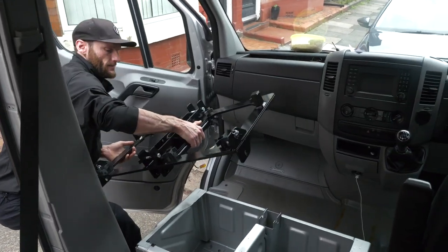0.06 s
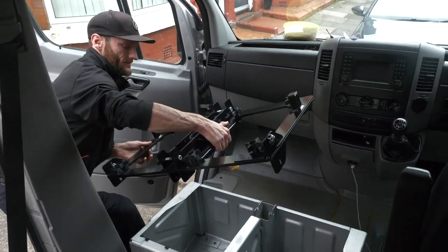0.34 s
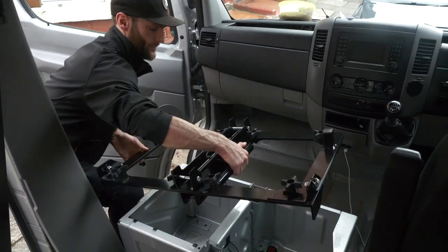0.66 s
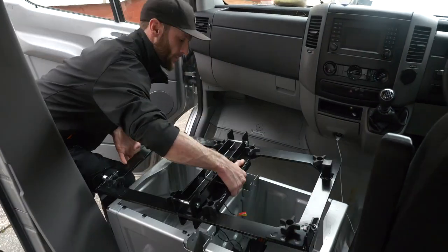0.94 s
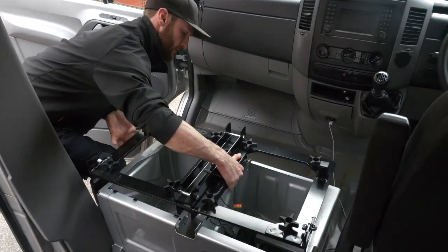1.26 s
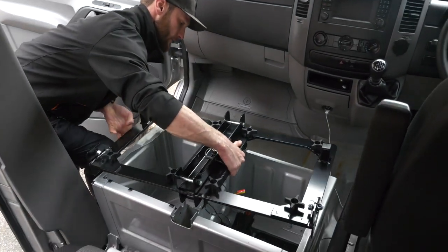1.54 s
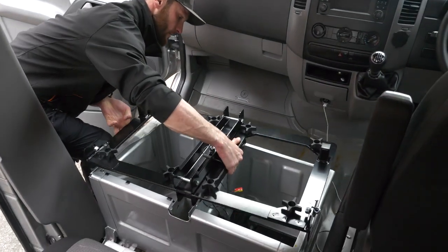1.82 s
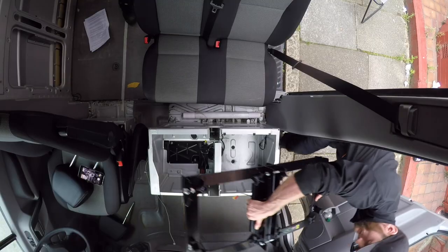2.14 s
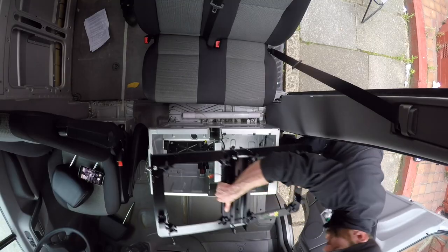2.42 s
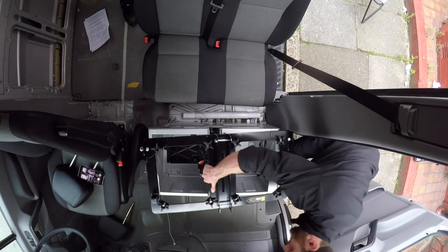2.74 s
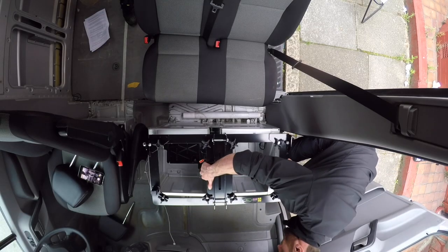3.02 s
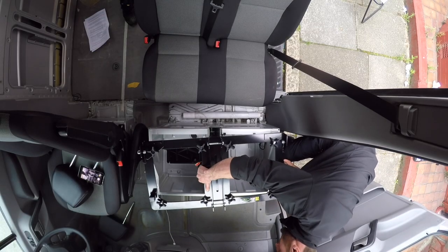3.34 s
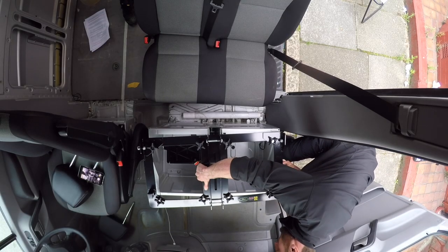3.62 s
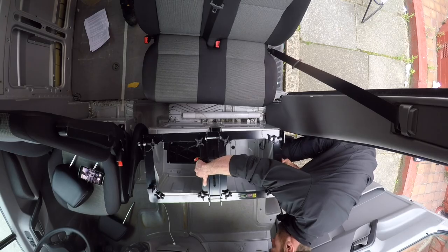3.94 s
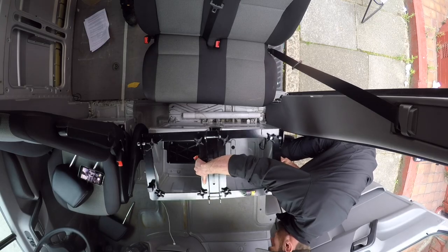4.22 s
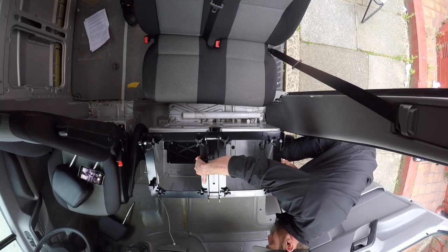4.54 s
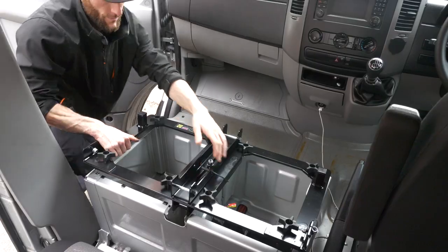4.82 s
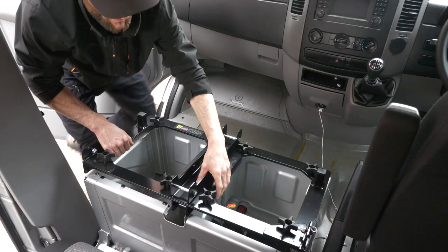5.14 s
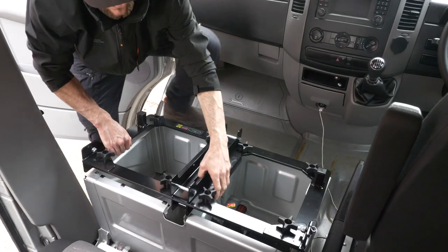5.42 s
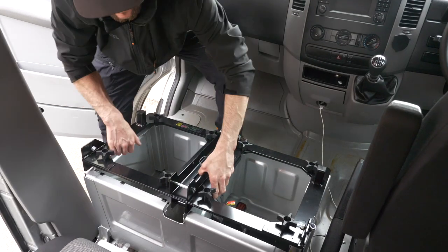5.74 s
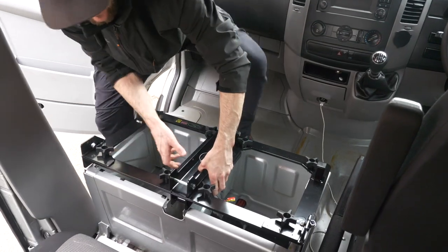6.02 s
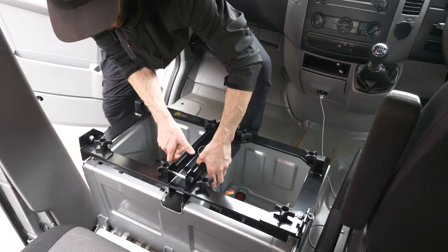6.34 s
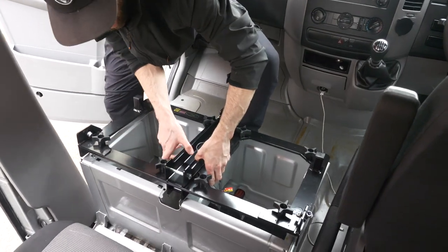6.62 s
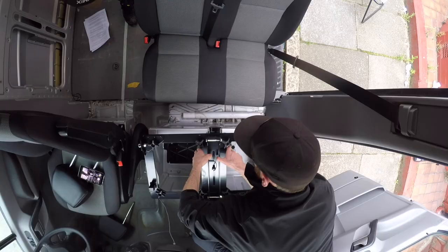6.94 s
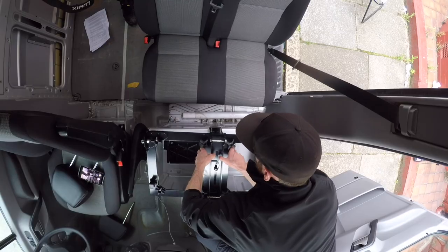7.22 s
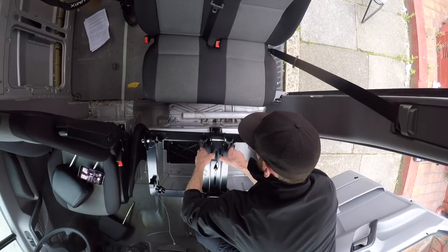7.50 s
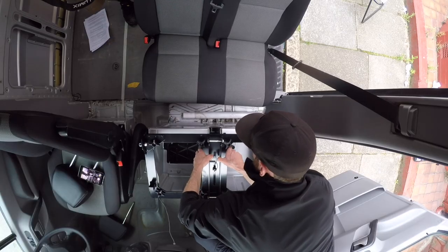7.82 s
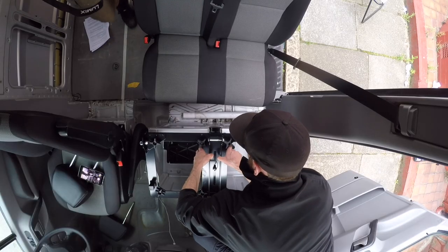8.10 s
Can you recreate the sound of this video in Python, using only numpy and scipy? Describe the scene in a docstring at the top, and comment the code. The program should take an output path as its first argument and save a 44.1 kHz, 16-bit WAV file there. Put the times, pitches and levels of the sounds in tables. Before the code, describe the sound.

A faint, low outdoor rumble comes through a van's open door throughout, with soft sleeve rustle. In the first second a steel seat frame taps and rings very lightly as it is carried. It knocks at 1.8 seconds and lands on its sheet-metal base at 2 with a bright, ringing clank. A quick run of knocks and loose rattles follows until about 2.8 seconds. A lull holds only small ticks and a little cloth movement. From 5.7 to 6 seconds the frame knocks again as it is jiggled. At about 6.3 seconds the slide catch snaps home with a sharp double crack, the loudest moment. A coil spring rings with it, thin, high and slightly buzzing, until a hand damps it and a small click comes near 6.8. One firmer knock sounds at 7.3 seconds, and a few lighter ones around 8.

```python
"""Over a faint outdoor rumble at a van's open door, sleeves rustle and a steel seat frame taps and rings
faintly as it is lifted in. It lands on its sheet-metal base with a bright clank and rocks back: impacts
excite the modes of frame and panels, and loose fittings rattle. As it is jiggled into place, a coil spring
is kicked and the slide catch snaps home. The spring sings until a hand damps it; a few knocks follow."""
import sys
import numpy as np
from scipy import signal
from scipy.fft import rfft, irfft, next_fast_len
from scipy.io import wavfile
from scipy.ndimage import uniform_filter1d, map_coordinates

SR = 44100
rng = np.random.default_rng(int(sys.argv[2]) if len(sys.argv) > 2 else 0)


def store_pcm(level_fs):
    """Save levels as 16-bit WAV."""
    pcm = np.round(np.clip(level_fs, -1, 1) * 32767).astype(np.int16)
    wavfile.write(sys.argv[1], SR, np.atleast_2d(pcm).T)


N = 360297

# Spectra of the outdoor rumble, the wash of air above it and the sleeve cloth.
# Each row: frequency in Hz, relative spectral density in dB.
RUMBLE_SPECTRUM = [(8, -14), (20, 6.5), (40, -1), (70, -12.5), (140, -34.5), (400, -64), (1000, -120)]
WASH_SPECTRUM = [(41, -23.5), (70, 4), (102, -10.5), (205, -8.5), (259, -7.5), (369, -7), (1600, -12.5),
                 (2080, -45), (3520, -120)]
CLOTH_SPECTRUM = [(590, -14.5), (1000, 1), (1710, -0.5), (1830, 2), (2310, 2), (3750, 2), (4900, -5.5),
                  (13800, -15.5), (16000, -25.5)]
# Slow swell of the rumble. Each row: time in seconds, relative level in dB.
RUMBLE_SWELL = [(.7, -61.5), (3.3, -64), (4.7, -65.5), (5.5, -62), (7.7, -58)]
# Arm movements. Each row: time of the peak in seconds, level in dB, rise and fall in seconds.
ARM_SWEEPS = [(.55, -63.5, 0.67, 0.18), (3.95, -65.5, .15, .3), (4.87, -61.5, 0.28, 0.13),
              (5.38, -57.5, 0.22, 0.15), (6.83, -59, 0.044, .03)]
# Knocks of the frame on its base. Each row: start in seconds, strength in dB, thud against strength
# in dB, hardness in dB, looseness as a factor (1 gives the usual ring and chatter).
IMPACTS = [(.384, -53.5, -1, 2, 1.46), (.965, -56, -17, 4, 1.2), (1.789, -29, -15.5, 3, .86),
           (2.009, -21.5, -5.5, -3.5, 0.86), (2.04, -35.5, -20, 8.5, 2.27), (2.22, -30.5, -6, -7, 2.1),
           (2.31, -32.5, -8, 4.5, 1.08), (2.361, -31.5, -12, 2.5, 1.14), (2.477, -38, -9.5, 3, 1.6),
           (2.55, -45.5, -7, -2, 1.5), (2.63, -23, -4, 8, 0.87), (2.682, -33.5, -7.5, 0.5, 2.06),
           (2.755, -28, -1.5, 1, 0.92), (2.796, -33, -2, 1.5, 0.8), (2.954, -55.5, 11.5, -39, 1.62),
           (3.775, -56.5, -7, 5, 1.7), (4.517, -53.5, -11, 2.5, 2.7), (5.026, -57.5, -4, 6.5, 1.7),
           (5.653, -42.5, 2, -4.5, 0.78), (5.776, -50, 7, -15.5, 0.86), (5.872, -27, -10, -4, .95),
           (5.972, -30, -10.5, -5.5, 1.24), (6.139, -49, 3, -1.5, .85), (6.201, -43.5, 0.5, 9.5, 2),
           (6.249, -29.5, -4, 10.5, 0.68), (6.267, -16.5, -22, 7.5, 0.59), (6.3, -19.5, -26, 5.5, 0.99),
           (6.412, -38, -6.5, 13, 1.14), (6.576, -46.5, -8, 4, 1.16), (6.844, -48, -13, 17, 1.32),
           (7.05, -50.5, 0.5, 10, 1), (7.221, -44, 8, -10, 1.37), (7.283, -25.5, -5.5, -5.5, 0.94),
           (7.402, -51.5, -6, 4.5, 1.5), (7.561, -61.5, 7.5, 11, 1), (7.73, -61.5, 11, -10, 1.1),
           (7.81, -57.5, -4, 4.5, 1.7), (7.956, -42, 4, -14, 0.84), (8, -51.5, 3, 10.5, 0.99),
           (8.134, -46, 1, -7.5, 1.05)]
# Registers of the panel modes: thud, body, clank, crack. Each row: lower and upper edge in Hz,
# t60 in seconds at looseness 1, relative level of the late tail in dB, its t60 in seconds.
PANEL_REGISTERS = [(68, 300, 0.39, -14, 1), (305, 1490, 0.25, -16.5, 0.71), (1420, 4020, 0.2, -30.5, 0.54),
                   (4400, 28000, 0.15, -33, .3)]
# Dense modes of the sheet metal. Each row: frequency in Hz, relative spectral density in dB.
PANEL_SPECTRUM = [(35, -28.5), (60, 7), (287, -1.5), (338, -4.5), (458, 0.5), (803, 0.5), (882, 1),
                  (1170, 0), (1780, -2), (2140, -1.5), (2770, 2.5), (12400, -20.5), (16000, -37.5)]
# Stereo width of the steel. Each row: frequency in Hz, side against mid in dB.
STEEL_WIDTH = [(60, -1), (110, 2.5), (200, -1.5), (380, -3.5), (700, -5.5), (1290, -5), (2380, -9),
               (4400, -9), (8120, 1.5), (15000, -2)]
# Strong modes of frame and base. Each row: frequency in Hz, free t60 in seconds,
# relative levels in dB while landing, while carried or sliding, and once seated.
FRAME_MODES = [(77.2, 0.71, -36, -13, -8), (150.9, 0.55, -6.5, -9.5, -8.5), (187.3, 0.55, -13, -15.5, -38),
               (222, 0.46, -17, -29, -13.5), (286.1, 0.42, -12, -8, -13.5),
               (302.1, 0.59, -10.5, -15, -16.5), (457, 0.34, -14, -15.5, -9), (509, 0.47, -26, -13, -17),
               (579, 0.34, -38, -13, -21), (630, 0.3, -25, -6, -17.5), (711, 0.34, -19, -10.5, -27.5),
               (737, 0.31, -12, -8, -26.5), (812, 0.28, -25, -30, -21), (900, 0.27, -13, -11.5, -10.5),
               (950, 0.37, -23, -12, -33.5), (1034, 0.21, -12, -32, -9.5), (1242, 0.37, -16.5, -14, -18),
               (1461, 0.28, -14, -11, -16.5), (1515, 0.089, -3, -12, -12.5), (1736, 0.33, -2.5, -20, -28.5),
               (1822, 0.32, -8, -19, -20), (2640, 0.3, -28, -14.5, -31), (2735, 0.15, -23, -24, -7.5),
               (2790, 0.22, -6.5, -35, -20), (2910, 0.11, -4, -42, -7), (3200, 0.26, -8, -38, -30),
               (3440, 0.18, -5, -11, -19.5), (3830, 0.37, -5.5, -28, -38), (5500, 0.18, -24.5, -9, -16),
               (6780, 0.28, -12, -19, -24)]
# The faint ring of the carried frame (0.40 s), the bright 3 kHz clank of its landing (2.011 s) and,
# in the other rows, loose fittings rattling. Each row: start in seconds, centre pitch in Hz,
# level in dB, t60 of the train and t60 of one tick in seconds, pitch scatter as a fraction.
PING_TRAINS = [(.40, 2575, -55, 0.64, 0.24, 0.006), (2.044, 3990, -35, 0.8, 0.213, 0.0132),
               (2.011, 2953, -19, 0.25, 0.093, .17), (2.044, 6350, -30, 0.42, 0.045, .05),
               (2.708, 5840, -35.5, 0.33, 0.047, 0.062), (4.519, 3155, -37, .11, 0.042, 0.101),
               (6.846, 3385, -35, 0.089, 0.082, 0.301)]
# Clicks and snaps of the slide catch. Each row: start in seconds, relative peak in dB.
CATCH_SNAPS = [(4.5205, -39), (6.2677, 3), (6.2708, -6), (6.2784, -17), (6.3006, 1)]
# Kicks to the spring. Each row: start in seconds, relative levels of ringing and of buzz in dB.
SPRING_KICKS = [(6.199, -9, -8.5), (6.25, 2.5, 3.5), (6.266, 6.5, 4.5), (6.412, 4.5, -0.5), (6.53, -3, -7),
                (6.582, 3, -9)]
# Modes of the coil spring. Each row: frequency in Hz, relative levels in dB when free and when
# reseated, t60 in seconds under the hand.
SPRING_MODES = [(1992, -50, -63, 0.42), (2401, -42, -43, 0.36), (2810, -44, -61, 0.36),
                (3176, -46, -44, 0.22), (3381, -40, -56, 0.4), (3661, -44, -58, 0.48),
                (4204, -50, -56, 0.22), (4492, -50, -56, 0.37), (4818, -45, -59, 0.68),
                (5577, -48, -59, 0.25), (5922, -48, -55, 1.3), (6492, -52, -58, 0.23),
                (6955, -47, -67, 0.4), (7467, -54, -61, 0.28), (8025, -51, -61, 0.28),
                (8568, -46, -63, 0.34), (8915, -50, -64, 0.28), (9555, -56, -64, 0.24),
                (10048, -53, -65, 0.3), (10755, -57, -65, 0.23), (11583, -53, -61, 0.22),
                (12123, -53, -61, 0.2), (12333, -54, -60, 0.2), (14085, -60, -77, 0.34),
                (14645, -57, -66, 0.21), (14990, -56, -64, 0.2), (15260, -56, -65, 0.2)]

CARRY_FROM_S, CARRY_TO_S = .03, 1.05
TAP_DB, TAP_SCATTER_DB, TAP_THUD_DB, TAP_HARD_DB, TAP_LOOSE = -63, .5, -15, 2.5, 2.65
LANDING_S, SLIDING_S, SEATED_S = 2, 2.2, 4
ROCK_DELAY_S, ROCK_DB, ROCK_THUD_DB, ROCK_SOFTER_DB = .088, -17, -.5, 8
BODY_DB, CLANK_DB, CRACK_DB = .5, -.5, -12  # against the strength of a blow
HARD_TILT = .24  # dB moved from body to clank per dB of hardness
CHATTER_S = .0065  # steel bounces this long before decaying, at looseness 1
RESEAT_S, GRIP_S, LOCK_S = 6.58, 6.668, 6.846  # the spring reseats, is gripped, and the catch locks
TOP_HZ = 15900


def amp(db):
    """Amplitude grows tenfold for every 20 dB."""
    return 10 ** (np.asarray(db) / 20)


def along(points, hz):
    """Interpolation of (Hz, value) points on a logarithmic frequency axis."""
    freqs, values = np.transpose(points)
    return np.interp(np.log(hz + 1), np.log(freqs + 1), values)


def wobble(rate, size):
    """Smooth random modulation: a spline through `rate` knots a second."""
    return map_coordinates(rng.standard_normal(1024), [np.arange(size) * rate / SR], mode="wrap")


def filtered(x, response):
    """Linear filtering multiplies the spectrum by a frequency response."""
    size = x.shape[-1]
    padded = next_fast_len(size + SR // 8)
    return irfft(rfft(x, padded) * response(np.fft.rfftfreq(padded, 1 / SR)), padded)[..., :size]


def fade(t, t60):
    """Exponential damping: full strength until t = 0, then 60 dB lost every t60 seconds."""
    return np.exp(-np.log(1000) * np.maximum(t, 0) / max(t60, 1e-3))


def add(track, s, sound):
    """Superposition: the sound adds to the track from s seconds on."""
    part = track[:, max(round(s * SR), 0):][:, :sound.shape[-1]]
    part += sound[..., :part.shape[-1]]


def noise(spectrum, width, band=lambda hz: 1):
    """Coloured noise with a mid of rms 1; an independent side signal decorrelates the channels."""
    def response(hz):
        return amp(along(spectrum, hz)) * band(hz) * np.array([np.ones_like(hz), amp(along(width, hz))])
    mid, side = filtered(rng.standard_normal((2, N)), response)
    return np.array([mid + side, mid - side]) / np.std(mid)


def partial(hz, t):
    """One normal mode: a sinusoid with a phase difference between left and right."""
    phase = 2 * np.pi * (hz * t + rng.random())
    side = rng.choice([-1, 1]) * amp(along(STEEL_WIDTH, hz)) * np.cos(phase)
    mid = np.sin(phase)
    return np.sqrt(2) * np.array([mid + side, mid - side])


def street(wash_db=-66, rumble_db=-1):
    """Ambient noise enters by the open door: a steady wash over a slowly varying rumble."""
    swell_db = np.interp(np.arange(N) / SR, *np.transpose(RUMBLE_SWELL))
    wash = amp(wash_db) * noise(WASH_SPECTRUM, width=[(100, 4), (1000, -3)])
    rumble = amp(swell_db + rumble_db) * noise(RUMBLE_SPECTRUM, width=[(25, 9.1), (100, 11)])
    return wash * amp([[-.76], [.76]]) + rumble * amp([[2.5], [-3]])


def sleeves(still_db=-66.5, flutter_db=1.75):
    """Friction of cloth makes noise; each arm movement adds its power to a steady hush."""
    t = np.arange(N) / SR
    swells = [amp(db) * np.exp(-.5 * ((t - s) / np.where(t < s, rise_s, fall_s)) ** 2)
              for s, db, rise_s, fall_s in ARM_SWEEPS]
    envelope = np.sqrt(amp(still_db) ** 2 + np.sum(np.square(swells), axis=0))
    flutter = amp(flutter_db * wobble(28, N))
    cloth = noise(CLOTH_SPECTRUM, width=[(1000, -2.5), (3000, -8), (8000, 1)])
    return envelope * flutter * cloth * amp([[-.76], [.76]])


def contacts(tap_count=8):
    """Impact excitation by taps, knocks and rocking back: harder contact favours higher frequencies."""
    taps = [(CARRY_FROM_S + (CARRY_TO_S - CARRY_FROM_S) * (k + rng.random()) / tap_count,
             TAP_DB + TAP_SCATTER_DB * rng.standard_normal(), TAP_THUD_DB, TAP_HARD_DB, TAP_LOOSE)
            for k in range(tap_count)]
    # the frame's weight rocks it back after each knock, in proportion to the thud
    rocks = [(s + ROCK_DELAY_S, db + thud_db + ROCK_DB, ROCK_THUD_DB, hard_db - ROCK_SOFTER_DB, loose)
             for s, db, thud_db, hard_db, loose in IMPACTS]
    s, db, thud_db, hard_db, loose = np.transpose(IMPACTS + rocks + taps)
    tilt_db = HARD_TILT * hard_db
    levels = [db + thud_db, db + BODY_DB - tilt_db, db + CLANK_DB + tilt_db, db + CRACK_DB + hard_db]
    # Each row: start in seconds, level of each of the four registers in dB, looseness.
    return np.transpose([s, *levels, loose])


def panel_clanks(blows, trim_db=(-1, -2, -1, 0), rise_s=(.008, .003, .002, .001), chatter_db=2):
    """Modal overlap: the dense modes of struck panels merge into bands of decaying noise."""
    out, t = np.zeros((2, N)), np.arange(int(.7 * SR)) / SR
    knots = t[::128]
    for k, (lo, hi, t60, tail_db, tail_t60) in enumerate(PANEL_REGISTERS):
        panel = noise(PANEL_SPECTRUM, STEEL_WIDTH,
                      band=lambda hz: 1 / np.sqrt((1 + (lo / (hz + 1)) ** 12) * (1 + (hz / hi) ** 12)))
        for s, *levels, loose in blows:
            strike = amp(levels[k] + trim_db[k]) * (1 - np.exp(-t / rise_s[k]))
            free_s = t - CHATTER_S * loose
            decay = np.hypot(fade(free_s, t60 * loose), amp(tail_db) * fade(free_s, tail_t60))
            # steel bouncing on steel makes the level uneven
            bounce = amp(chatter_db * np.interp(t, knots, rng.standard_normal(len(knots))))
            start = rng.integers(N - len(t))
            add(out, s, strike * decay * bounce * panel[:, start:start + len(t)])
    return out


def frame_ring(blows, level_db=.5, rise_s=.0036, scatter_db=2, rough=.14):
    """Boundary conditions: how the frame rests decides which of its strong modes answer a blow."""
    out, t = np.zeros((2, N)), np.arange(SR // 2) / SR
    hz, t60, *support_db = np.transpose(FRAME_MODES)
    register = np.searchsorted([row[1] for row in PANEL_REGISTERS[:-1]], .9 * hz)
    modes = np.array([partial(f, t) * fade(t, life) * (1 + rough * wobble(45, len(t)))
                      for f, life in zip(hz, t60)])
    for s, *levels, loose in blows:
        support = 0 if LANDING_S < s < SLIDING_S else 1 if s < SEATED_S else 2
        db = np.take(levels, register) + support_db[support] + level_db
        db += scatter_db * rng.standard_normal(len(hz))
        ring = np.tensordot(amp(db) * rng.choice([-1, 1], len(hz)), modes, 1)
        damping = np.exp(-t / .03 * max(1 / loose - 1, 0))  # firm contact cuts the ringing short
        add(out, s, ring * damping * (1 - np.exp(-t / rise_s)))
    return out


def steel_pings(ticks_per_s=58, uneven=.2, rise_s=.00059, ping_count=8):
    """Damped modes in quick succession: the frame's faint ring, its landing clank, rattling fittings."""
    out, t = np.zeros((2, N)), np.arange(SR // 8) / SR
    for s, hz, db, train_t60, tick_t60, scatter in PING_TRAINS:
        envelope = fade(t, tick_t60) * (1 - np.exp(-t / rise_s))
        gaps = (1 + uneven * rng.standard_normal(11)) / ticks_per_s
        for delay in np.cumsum(gaps) - gaps[0]:
            pitches = hz * np.exp(scatter * rng.standard_normal(ping_count))
            pings = sum(partial(f, t) for f in pitches) / np.sqrt(ping_count)
            add(out, s + delay, amp(db) * fade(delay, train_t60) * envelope * pings)
    return out


def slide_catch(t60=.0042, band_hz=(500, 5500), level_db=-3, width=.52):
    """A brief impact has a broad spectrum: the catch lands with hard, very short cracks."""
    out, t = np.zeros((2, N)), np.arange(SR // 20) / SR
    bandpass = signal.butter(2, band_hz, "band", fs=SR, output="sos")
    for s, db in CATCH_SNAPS:
        burst = rng.standard_normal(len(t)) + width * rng.standard_normal((2, len(t)))
        crack = signal.sosfilt(bandpass, burst * fade(t, t60))
        add(out, s, amp(db + level_db) * crack / np.abs(crack).max())
    return out


def coil_spring(free_db=-2, held_db=.5, buzz_db=-1, buzz_t60=.25, slip_s=.0125,
                sag_db_per_s=36.5, touches_per_s=28):
    """Inharmonic wire modes ring after each kick and graze the frame until a hand damps them."""
    out, t = np.zeros((2, N)), np.arange(SR) / SR
    kick_s, ring_db, touch_db = np.transpose(SPRING_KICKS)
    now = kick_s[0] + t
    latest = np.maximum(np.searchsorted(kick_s, now, "right") - 1, 0)
    since_kick = now - kick_s[latest]
    swing_db = ring_db[latest] - sag_db_per_s * since_kick
    buzz = amp(buzz_db + touch_db[latest]) * fade(since_kick, buzz_t60)
    touch = (t * touches_per_s).astype(int)
    seated = np.clip((now - RESEAT_S) / slip_s + .5, 0, 1)
    for hz, ringing_db, seated_db, t60 in SPRING_MODES:
        # every touch shares the energy anew among the modes, most of all while the spring is free
        share_db = np.where(now < RESEAT_S, 3.5, 1.5) * rng.standard_normal(128)[touch]
        strength = uniform_filter1d(amp(swing_db + share_db), size=192)
        free = (1 - seated) * amp(free_db + ringing_db)
        held = seated * amp(held_db + seated_db) * fade(now - GRIP_S, t60)
        # contact bends the pitch and roughens the modes, the high ones most
        bend = .16 * wobble(22, SR) * fade(now - GRIP_S, .2) / hz
        grit = 1 + buzz * np.sqrt(hz / 6000) * wobble(450, SR)
        # the wire swings in two planes, whose modes beat
        pair = partial(hz, t + bend) + .4 * partial(hz * (1 + rng.uniform(.001, .005)), t)
        add(out, kick_s[0], (free + held) * strength * grit * pair * fade(now - LOCK_S, .05))
    return out


def scene():
    """The sources superpose: the steel, slightly to the right, over sleeves and street."""
    blows = contacts()
    steel = panel_clanks(blows) + frame_ring(blows) + steel_pings() + slide_catch() + coil_spring()
    return steel * amp([[-.4], [.4]]) + sleeves() + street()


def record(dry):
    """Clipping and band limiting: peaks stop at full scale, then all above TOP_HZ is removed."""
    return filtered(np.clip(dry, -1, 1), lambda hz: hz < TOP_HZ)


dry = scene()
out = record(dry)
store_pcm(out)
```